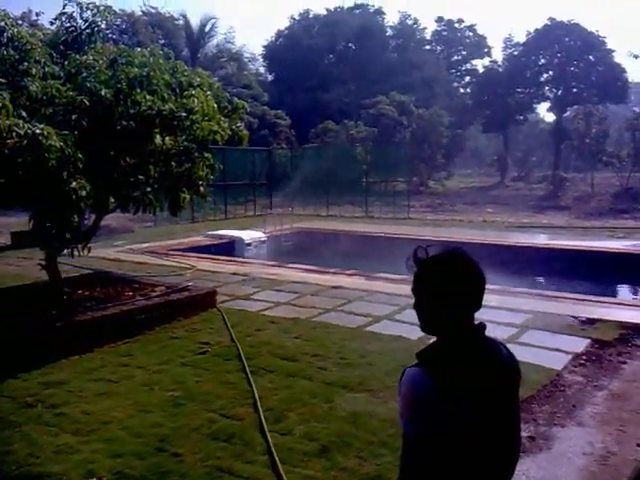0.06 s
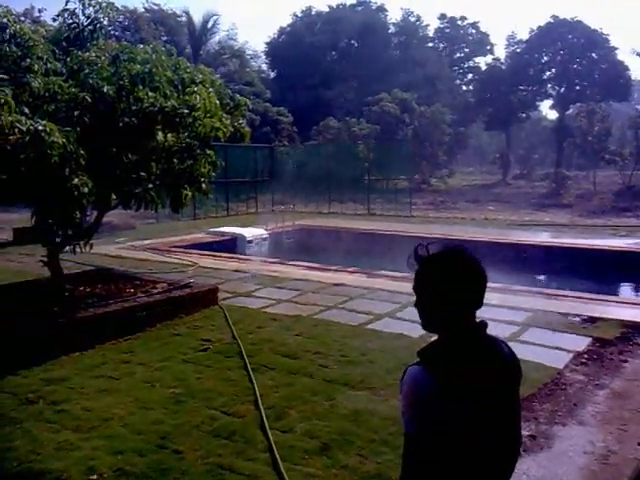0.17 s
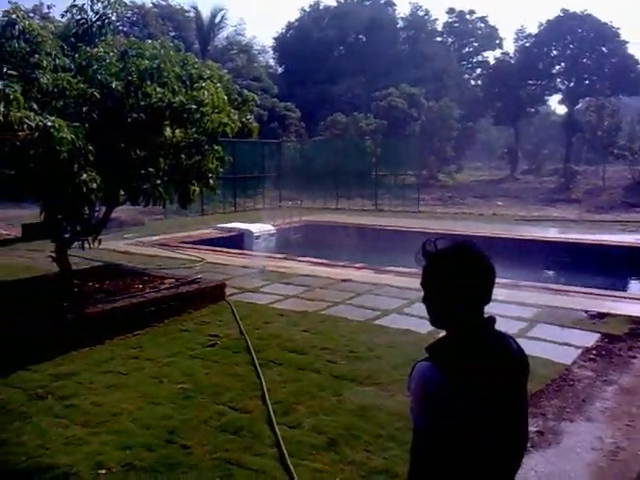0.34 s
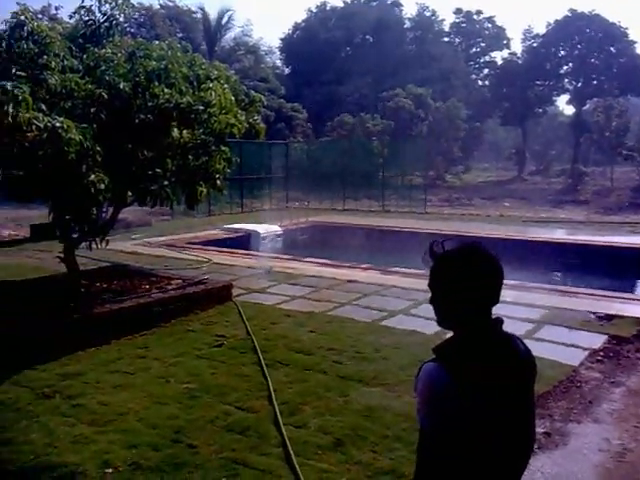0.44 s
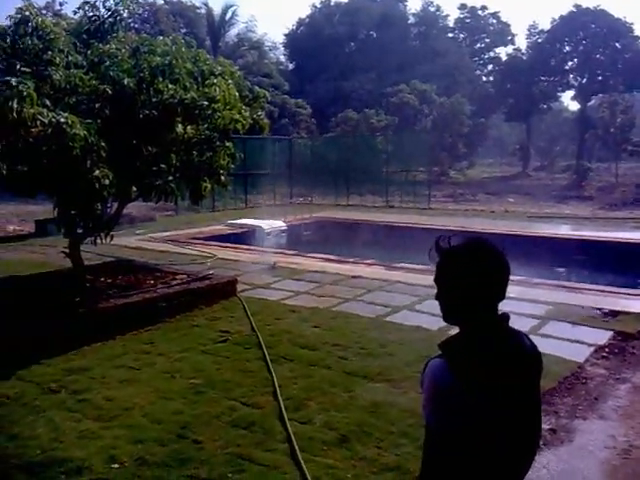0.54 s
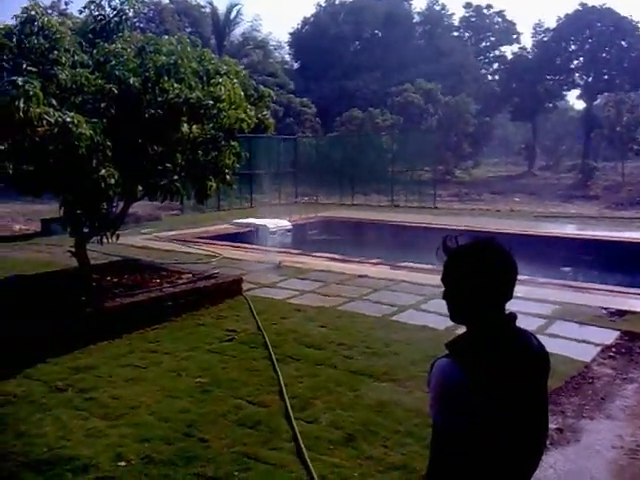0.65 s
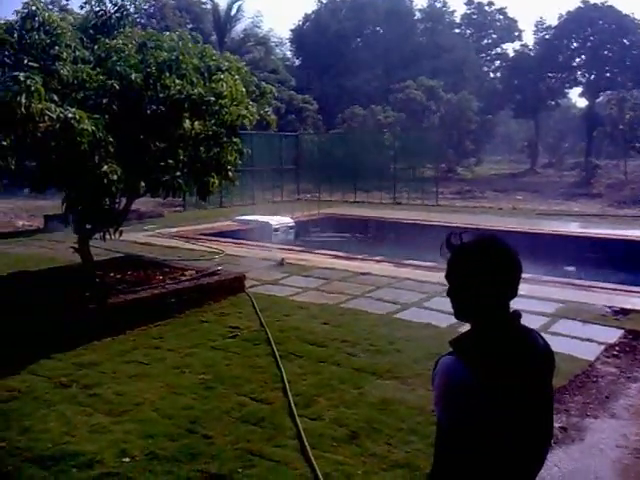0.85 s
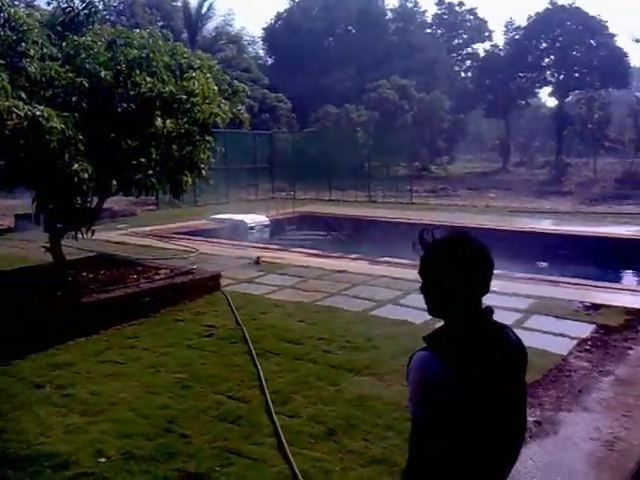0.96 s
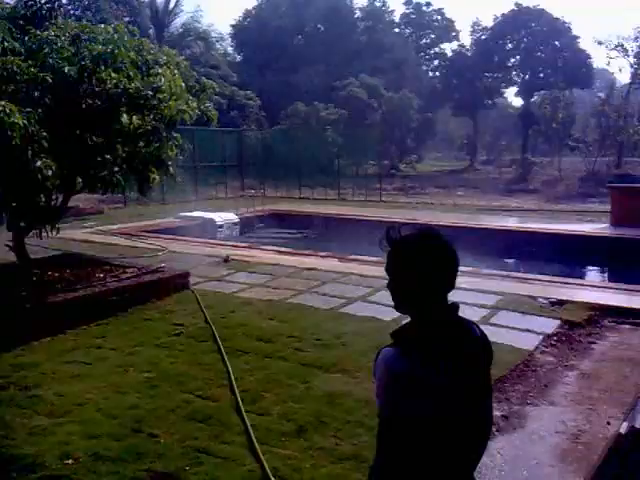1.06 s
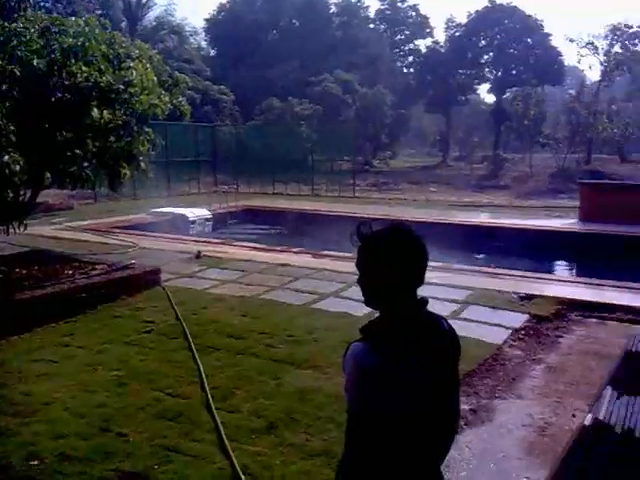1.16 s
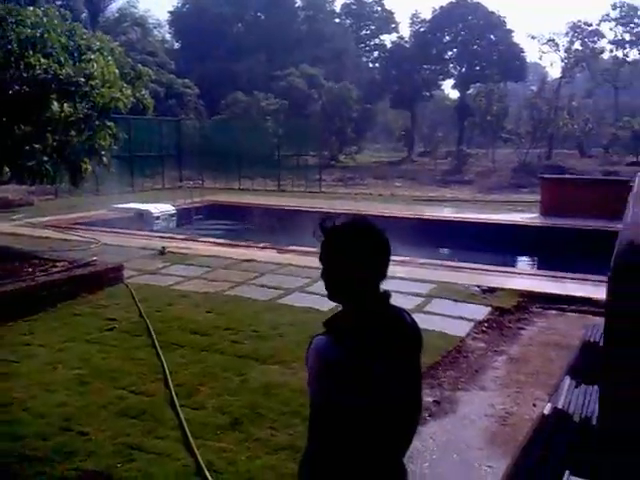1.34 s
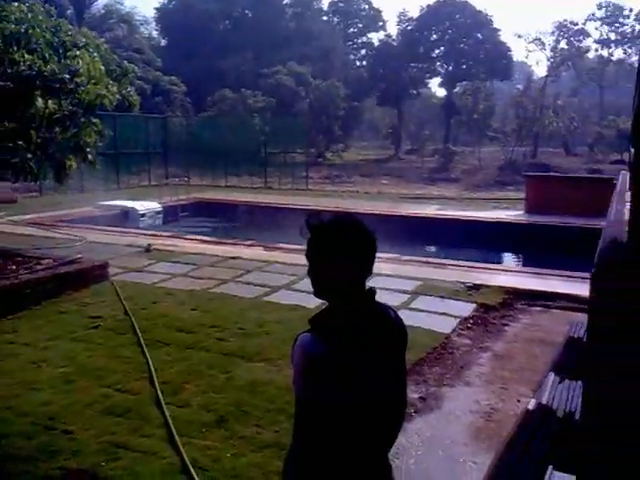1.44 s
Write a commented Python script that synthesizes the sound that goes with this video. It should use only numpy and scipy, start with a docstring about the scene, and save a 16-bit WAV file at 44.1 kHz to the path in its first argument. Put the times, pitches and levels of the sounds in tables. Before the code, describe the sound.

A dry double knock sounds right at the microphone as a hand rubs and softly bumps a small camera. Two very faint peeps and a light tap follow, over a quiet garden's steady hush and low rumble.

```python
"""A quiet garden, heard from the one microphone of a small hand-held camera that is being turned.
Right at the microphone the grip rubs, slips and bumps on the housing, which gives one dry double
knock and later a faint tap. Behind the handling lie a steady outdoor hush and a low rumble.
Two thin, faint peeps, perhaps of a far bird, come between the knock and the tap."""
import sys
import numpy as np
from scipy import signal
from scipy.fft import rfft, irfft, next_fast_len
from scipy.io import wavfile
from scipy.ndimage import uniform_filter1d, map_coordinates

SR = 44100
rng = np.random.default_rng(int(sys.argv[2]) if len(sys.argv) > 2 else 0)


def log_audio(samples):
    """Write samples as a 16-bit WAV file to the path given in sys.argv[1]."""
    # one column per channel
    frames = np.atleast_2d(samples).T
    # limit to full scale, then quantise
    limited = np.clip(frames, -1, 1)
    pcm = np.round(limited * 32767).astype(np.int16)
    wavfile.write(sys.argv[1], SR, pcm)


N = 66150

# the garden's hush, all around (frequency [Hz], relative level [dB])
HUSH_SPECTRUM = [(100, -1.5), (200, -2.5), (350, 1.5), (500, -1), (750, 3.5), (1050, -0.5), (1350, 2.5),
                 (1650, 0), (2030, 7), (2250, 2), (2500, -1), (3000, -4.5), (4000, -8.5), (4850, -1),
                 (5600, -8.5), (6500, -9.5), (7600, -11.5), (13000, -10), (16000, -10.5)]
# low rumble under everything (time [s], level [dB])
RUMBLE_LEVELS = [(0, -59.5), (.12, -58), (.2, -49.5), (.36, -57), (.46, -57), (.6, -57), (.74, -60.5),
                 (.85, -62.5), (1.0, -61.5), (1.15, -66.5), (1.5, -69.5)]
# its colour (frequency [Hz], relative level [dB])
RUMBLE_SPECTRUM = [(12, -23), (36, 4.5), (70, -1), (110, -8.5), (170, -14), (300, -33.5), (1000, -96)]
# the grip rubbing, right at the microphone (time [s], level [dB])
RUB_LEVELS = [(0, -60), (.07, -63.5), (.13, -60.5), (.23, -52.5), (.29, -57), (.36, -53.5), (.45, -60.5),
              (.50, -51.5), (.55, -58), (.58, -45.5), (.62, -50.5), (.67, -54.5), (.72, -53.5), (.78, -60),
              (.92, -66), (1.16, -65.5), (1.24, -60), (1.5, -63.5)]
# its colour (frequency [Hz], relative level [dB])
RUB_SPECTRUM = [(100, -9.5), (350, -2.5), (500, -5.5), (800, 1.5), (1050, -5), (1650, -2.5), (2080, 0),
                (2300, -1.5), (2520, 0.5), (2900, -9.5), (3900, -9.5), (4900, -6.5), (5700, -8.5),
                (6600, -7), (8000, -14.5), (13000, -14.5), (16000, -18)]
# short, brighter slips of the grip (time [s], scrape level [dB], half length [s], squeak pitch [Hz])
GRIP_SLIPS = [(0.084, -60, 0.005, 5160), (0.109, -58.5, 0.0069, 2180), (0.21, -56, 0.0037, 5030),
              (0.228, -56, 0.0029, 2440), (0.333, -57.5, 0.0058, 5250), (.358, -57, 0.0044, 2450),
              (0.441, -55.5, 0.0031, 6100), (0.706, -55, 0.011, 5500), (0.834, -59.5, 0.012, 6650),
              (0.958, -63, 0.011, 6600), (1.087, -59.5, 0.0092, 5150), (1.211, -59, 0.008, 5400),
              (1.316, -57, 0.0024, 2400), (1.341, -60.5, 0.015, 6200), (1.467, -61.5, 0.011, 6860)]
# colour of their scrape (frequency [Hz], relative level [dB])
SCRAPE_SPECTRUM = [(200, -8), (1200, 3.5), (2300, 6), (3500, 2), (5200, 5), (6800, 1.5), (8500, -2.5),
                   (16000, -12)]
# soft bumps of the hand (time [s], peak level [dB], pitch [Hz], half length [s])
HAND_BUMPS = [(.174, -41.5, 97.5, 0.0075), (.229, -45, 64, 0.017), (.250, -39, 101, 0.0059),
              (.319, -41, 93, 0.014), (0.321, -45, 170, 0.0068), (0.427, -50.5, 80, .009),
              (.496, -37, 42.3, 0.021), (0.498, -40.5, 150, 0.0028), (.584, -44.5, 55, 0.011),
              (.663, -48, 59.7, 0.0086), (1.279, -56, 69.6, 0.0065)]
# the knock's first contact, a softer catch (frequency [Hz], gain [dB])
CATCH_SPECTRUM = [(40, 8), (200, -2), (370, 7), (750, -5), (1250, -1.5), (1900, 3), (2500, 3.5),
                  (3200, -16), (3900, -26), (4900, -5), (6000, -22), (9000, -31), (15000, -38)]
# its second contact, a blow with a hard edge (frequency [Hz], gain [dB])
BLOW_SPECTRUM = [(40, -32), (230, -14), (370, 6.5), (480, 4), (680, 10.5), (880, -5), (1100, 9.5),
                 (1450, 10), (1800, 1.5), (2450, 8.5), (3200, 1.5), (4100, 4), (4850, -13), (5600, -3),
                 (8000, -12.5), (10500, -3.5), (12100, -29), (12900, -3), (14000, -28), (15500, -23)]
# thin peeps, perhaps far off (start [s], length [s], level [dB])
FAINT_PEEPS = [(0.784, .064, -66.5), (0.998, 0.07, -68.5)]
# the late tap on the housing (frequency [Hz], relative level [dB])
TAP_SPECTRUM = [(40, -9), (200, -4), (380, 3), (520, -3), (700, -23), (900, -4), (1500, -13), (3000, -36),
                (12000, -51)]

TIME = np.arange(N) / SR


def amp(db):
    """Decibels to gain."""
    return 10 ** (np.asarray(db) / 20)


def unit(x):
    """Scale to rms 1."""
    return x / np.sqrt(np.mean(x ** 2) + 1e-20)


def spectrum_gain(spectrum, hz):
    """Gain at hz, with the spectrum's points joined on a log frequency axis."""
    points_hz, points_db = np.transpose(spectrum)
    return amp(np.interp(np.log(hz + 1), np.log(points_hz + 1), points_db))


def envelope(levels):
    """Gain at every sample, from (time [s], level [dB]) points."""
    return amp(np.interp(TIME, *np.transpose(levels)))


def wobble(rate_hz):
    """A smooth random curve with rate_hz knots a second."""
    return map_coordinates(rng.standard_normal(N), [TIME * rate_hz], mode="mirror")


def filtered(x, response):
    """Filter x by a gain given as a function of frequency."""
    size = next_fast_len(N + SR // 2)
    return irfft(rfft(x, size) * response(np.fft.rfftfreq(size, 1 / SR)), size)[:N]


def noise(spectrum):
    """Coloured noise of rms 1."""
    return unit(filtered(rng.standard_normal(N), lambda hz: spectrum_gain(spectrum, hz)))


def patchy(x, depth_db):
    """Let each narrow band of x wander in level; the result has rms 1."""
    bands = signal.stft(x, nperseg=256)[2]
    drift = uniform_filter1d(rng.standard_normal(bands.shape), size=5, axis=1)  # smooth in time
    drift = unit(uniform_filter1d(drift, size=3, axis=0))  # and across bands
    return unit(signal.istft(bands * amp(depth_db * drift), nperseg=256)[1][:N])


def garden_hush():
    """Steady open-air hush all around the microphone, wavering slightly."""
    level_db = -61 + 0.78 * wobble(rate_hz=26)
    return amp(level_db) * noise(HUSH_SPECTRUM)


def rumble():
    """A low rumble that swells while the camera moves."""
    return envelope(RUMBLE_LEVELS) * noise(RUMBLE_SPECTRUM)


def grip_rub(grain_db=1.45):
    """The hand rubs the housing beside the microphone; stick and slip make it grainy."""
    friction = noise(RUB_SPECTRUM) * amp(grain_db * wobble(rate_hz=260))
    return envelope(RUB_LEVELS) * patchy(friction, depth_db=3)


def grip_slips(squeak_db=-3, squeak_width_hz=1060):
    """Each short slip of the grip gives a close, broad scrape and a weaker squeak."""
    scrape = patchy(noise(SCRAPE_SPECTRUM), depth_db=4)
    out = np.zeros(N)
    for at, db, half_s, pitch in GRIP_SLIPS:
        white = rng.standard_normal(N)
        squeak = unit(filtered(white, lambda hz: np.exp(-((hz - pitch) / squeak_width_hz) ** 2)))
        swell = amp(db) * np.exp(-((TIME - at) / half_s) ** 2 / 2)
        out += swell * (scrape + amp(squeak_db) * squeak)
    return out


def hand_bumps():
    """Each push of the hand rocks the camera, and its microphone, for a cycle or two."""
    out = np.zeros(N)
    for at, db, hz, half_s in HAND_BUMPS:
        t = TIME - at
        out += amp(db) * np.exp(-(t / half_s) ** 2) * np.cos(2 * np.pi * hz * t)
    return out


def housing_click(spectrum, at_s, lag_s, bend_hz=556, size=4096):
    """One dead click; low bending waves cross the housing up to lag_s later than the highs."""
    hz = np.fft.rfftfreq(size, 1 / SR)
    cepstrum = irfft(np.log(spectrum_gain(spectrum, hz)))
    # minimum phase: nothing sounds ahead of the contact
    cepstrum[1:size // 2] *= 2
    cepstrum[size // 2 + 1:] = 0
    delay_s = lag_s / (1 + (hz / bend_hz) ** 2)
    phase_lag = 2 * np.pi * np.cumsum(delay_s) * hz[1]
    pulse = irfft(np.exp(rfft(cepstrum) - 1j * phase_lag))
    return np.pad(pulse[:size // 2], (round(at_s * SR), N))[:N]


def double_knock(lag_s=0.00132):
    """The housing catches, then snaps home, dry and right at the microphone."""
    catch = housing_click(CATCH_SPECTRUM, at_s=0.56083, lag_s=lag_s)
    blow = housing_click(BLOW_SPECTRUM, at_s=0.5703, lag_s=lag_s)
    return catch + blow


def peeps(pitch_hz=6700, fade_s=0.008):
    """Two faint whistles on one pitch, perhaps a bird far from the microphone."""
    level = np.zeros(N)
    for start, length, db in FAINT_PEEPS:
        to_edge_s = np.minimum(TIME - start, start + length - TIME)
        level += amp(db) * np.clip(to_edge_s / fade_s, 0, 1)
    return level * np.sin(2 * np.pi * pitch_hz * TIME)


def faint_tap():
    """One late, soft contact of the housing, as close as the knock."""
    return amp(-10.5) * housing_click(TAP_SPECTRUM, at_s=1.2715, lag_s=0)


def scene():
    """The garden behind and the handling up close, all at the one microphone."""
    background = garden_hush() + rumble() + peeps()
    handling = grip_rub() + grip_slips() + hand_bumps() + double_knock() + faint_tap()
    return (background + handling)[None]


def record(dry, band_limit_hz=15830):
    """The camera keeps nothing above its band limit."""
    return filtered(dry[0], lambda hz: hz < band_limit_hz)[None]


dry = scene()
out = record(dry)
log_audio(out)
```